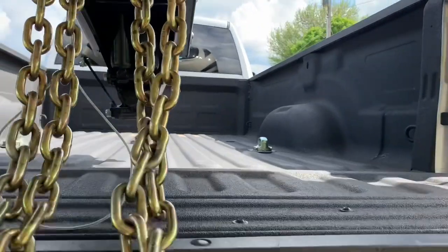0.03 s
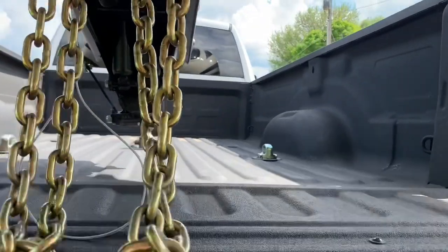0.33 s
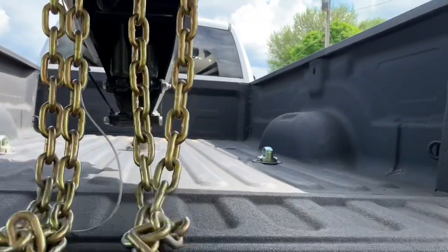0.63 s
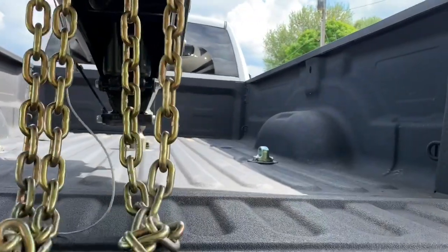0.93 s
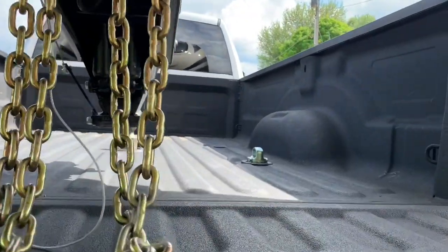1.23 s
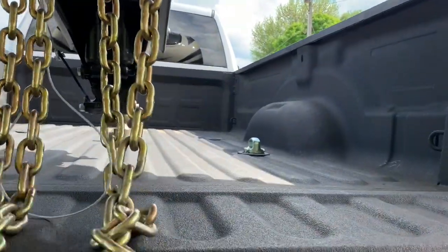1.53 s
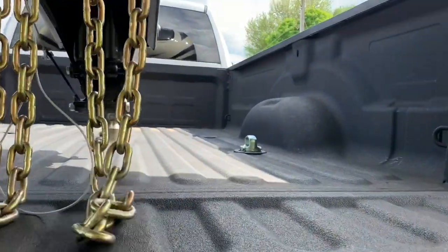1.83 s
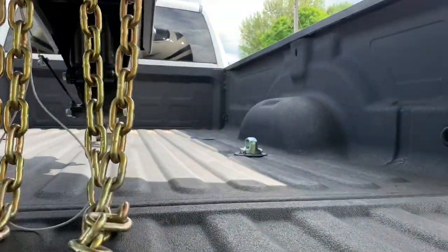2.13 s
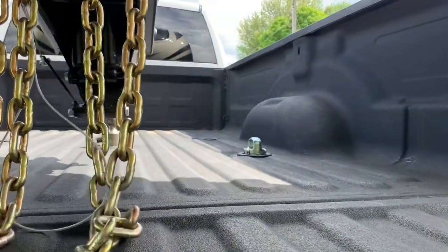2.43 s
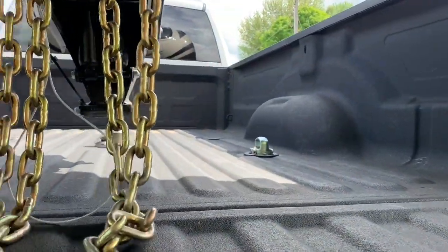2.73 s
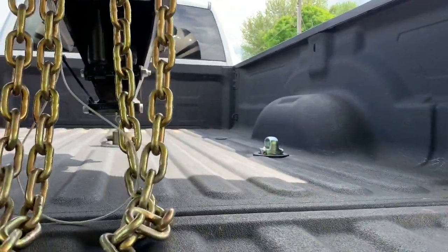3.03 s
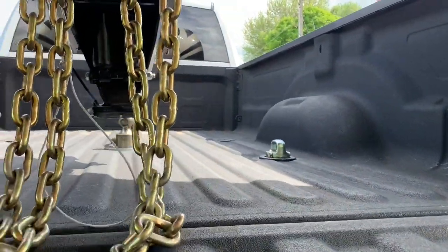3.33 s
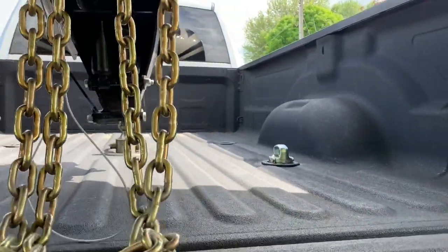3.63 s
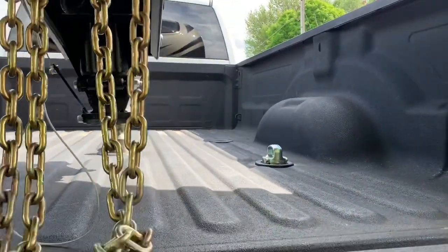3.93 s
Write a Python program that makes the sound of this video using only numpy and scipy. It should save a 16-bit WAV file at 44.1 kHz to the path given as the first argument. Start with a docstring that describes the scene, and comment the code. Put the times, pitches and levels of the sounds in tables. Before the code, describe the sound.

Steel chains rattle and clink in bursts, with hollow bumps and a low engine idle.

```python
"""Chains by a pickup tailgate

A camera is shifted in three moves over the tailgate of a pickup, close to hanging steel chains.
Stick-slip friction and bumps excite the hollow bed; links knock, and small steel parts tick and
ring in very high modes. An engine idles nearby under the outdoor rumble; a far bird chirps once."""
import sys
import numpy as np
from scipy import signal
from scipy.fft import rfft, irfft
from scipy.io import wavfile
from scipy.ndimage import uniform_filter1d

SR = 44100
rng = np.random.default_rng(int(sys.argv[2]) if len(sys.argv) > 2 else 0)


def dump_mix(stems):
    """Bounce the given channels to the path in sys.argv[1] as a 16-bit WAV at rate SR."""
    frames = np.atleast_2d(stems).T  # one column per channel
    limited = np.clip(frames, -1, 1)  # hard clip at full scale
    pcm = np.round(limited * 32767).astype(np.int16)
    wavfile.write(sys.argv[1], SR, pcm)


N = 176400


def undb(db):
    """Decibels to amplitude ratio."""
    return 10 ** (np.asarray(db) / 20)


def unit(x):
    """Normalisation to rms 1."""
    return x / np.sqrt(np.mean(x ** 2) + 1e-20)


def curve(rows, column=1):
    """Amplitude envelope from one dB column; silent outside its span."""
    rows = np.array(rows)
    return undb(np.interp(np.arange(N) / SR, rows[:, 0], rows[:, column], left=-200, right=-200))


def swell(middle_s, half_s):
    """Gaussian envelope."""
    return np.exp(-((np.arange(N) / SR - middle_s) / half_s) ** 2)


def response(points):
    """Magnitude response through (frequency_hz, gain_db) points."""
    hz, db = np.array(points).T
    return undb(np.interp(np.log(np.arange(N // 2 + 1) * SR / N + 1), np.log(hz), db))


def colour(x, points):
    """Minimum-phase filtering to a given spectral shape, at rms 1."""
    cepstrum = irfft(np.log(response(points)), N)
    cepstrum[1:N // 2] *= 2
    cepstrum[N // 2 + 1:] = 0
    return unit(irfft(rfft(x) * np.exp(rfft(cepstrum)), N))


def noise():
    """Two uncorrelated white noises."""
    return rng.standard_normal((2, N))


def walk(rate_hz):
    """Smooth random modulation at rms 1."""
    hold = int(SR / rate_hz)
    steps = np.repeat(rng.standard_normal(N // hold + 1), hold)
    return unit(uniform_filter1d(uniform_filter1d(steps, hold), hold)[:N])


def fade(t60):
    """Exponential decay, 60 dB in t60 seconds, cut at a quarter second."""
    return np.exp(-np.log(1000) * np.arange(SR // 4) / SR / max(t60, 1e-3))


def mode(hz, t60, phase=0):
    """Free vibration of a damped oscillator."""
    return fade(t60) * np.sin(2 * np.pi * hz * np.arange(SR // 4) / SR + phase)


def knock(hz, t60, scatter, count=20):
    """Impulse response of one main mode in a dense cluster, as mid and side."""
    neighbours_hz = hz * np.exp(scatter * rng.uniform(-1, 1, count))
    cluster = sum(rng.standard_normal((2, 1)) * mode(f, t60) for f in neighbours_hz)
    return cluster / np.sqrt(count) + np.array([[.5], [0]]) * mode(hz, t60)


def contacts(per_s, scatter_db):
    """Poisson train of tiny uneven impacts, each shared at random between two channels."""
    hit = rng.random(N) < per_s / SR
    size = undb(scatter_db * np.minimum(rng.exponential(size=N), 4))
    angle = 2 * np.pi * rng.random(N)
    return unit(hit * size * np.array([np.cos(angle), np.sin(angle)]))


def ring(force, body):
    """Forced vibration: convolution with a body's impulse response at unit energy."""
    body = body / np.sqrt(np.sum(body ** 2, axis=1, keepdims=True))
    return signal.fftconvolve(force, body, axes=1)[:, :N]


def add(out, start_s, sound):
    """Superposition of a sound at its onset."""
    i = max(int(start_s * SR), 0)
    out[:, i:i + sound.shape[1]] += sound[:, :N - i]


# Stereo width: frequency_hz, side_minus_mid_db
WIDTH = [(60, -5.5), (200, -14), (380, -8.5), (700, -4.5), (1300, -0.5), (2400, 2.5), (15000, -3.5)]
def spread(pair):
    """Mid-side stereo: left and right are more coherent in the bass than in the treble."""
    width = response(WIDTH)
    weights = np.array([np.ones_like(width), width]) / np.hypot(1, width)
    mid, side = irfft(rfft(pair) * weights, N)
    return np.array([mid + side, mid - side])


# Spectrum of the open air: frequency_hz, relative_db
AIR_SPECTRUM = [(20, -42), (48, -9.5), (120, -9.5), (205, -17.5), (291, -18), (510, -32), (762, -26.5),
                (826, -31.5), (1110, -34.5), (4830, -52), (8600, -73), (11000, -77.5), (15600, -108)]
# Its envelope: time_s, level_db
AIR_LEVEL = [(0, -27), (.5, -35), (1.15, -32), (1.9, -30), (3.3, -30.5), (3.8, -26.5), (4, -37)]
def outdoors():
    """Broadband ambient noise: a gently wavering rumble with faint hiss."""
    return spread(colour(noise(), AIR_SPECTRUM)) * curve(AIR_LEVEL) * undb(1.1 * walk(9.03))


# Engine tones: harmonic_number, relative_db
IDLE_HARMONICS = [(2, -34.5), (3, -31), (4, -56.5), (9, -48.5)]
# Engine envelope: time_s, gain_db
IDLE_GAIN = [(0, -3.5), (.28, 1), (.36, -9), (.68, -7.5), (.85, 0), (1.5, 2), (3.8, 2), (4, -6)]
def engine(firing_hz=32.72, wander=0.00703, lope_hz=86.83, lope_width_hz=26):
    """Periodic firing gives harmonics and pulsed clatter; narrowband noise adds an uneven lope."""
    phase = 2 * np.pi * np.cumsum(firing_hz * (1 + wander * walk(5.004))) / SR
    tones = 0
    for harmonic, db in IDLE_HARMONICS:
        amplitude = np.sqrt(2) * undb(db + 2 * walk(15))
        tones += amplitude * np.sin(harmonic * phase + 2 * np.pi * rng.random())
    lope_phase = 2 * np.pi * lope_hz * np.arange(N) / SR
    lope = unit(walk(lope_width_hz) * np.sin(lope_phase + walk(lope_width_hz)))
    firings = noise() * (1 + np.cos(phase)) * undb(2 * walk(20))
    clatter = spread(unit(ring(firings, knock(hz=1745, t60=0.18, scatter=0.31))))
    return (tones + undb(-36) * lope + undb(-57.5) * clatter) * curve(IDLE_GAIN)


# Envelopes, one list per move: time_s, scrape_gain_db, grit_gain_db, jingle_gain_db
MOVE_ENVELOPES = [
    [(.045, -53, -55, -70), (.057, -29.5, -47, -24), (.16, -31.5, -48.5, -27), (.21, -42.5, -52.5, -32),
     (.228, -23.5, -66, -52), (.25, -23.5, -54, -10.5), (.31, -30.5, -36, -16), (.335, -38.5, -48, -15.5),
     (.425, -26, -36.5, -13), (.46, -33, -44, -14), (.48, -38, -54, -33), (.497, -29, -46.5, -32),
     (.62, -35, -50, -22), (.69, -39, -60, -53), (.745, -36.5, -41, -34), (.79, -38.5, -64, -51),
     (1.05, -67, -100, -81)],
    [(1.36, -36, -58, -62), (1.425, -40.5, -55, -28), (1.455, -37, -60, -51), (1.475, -33, -34, -31),
     (1.52, -35, -46, -38), (1.57, -34, -45.5, -35), (1.605, -29, -45.5, -37), (1.68, -36, -55.5, -58),
     (1.765, -29.5, -42.5, -20), (1.82, -38.5, -53, -37), (1.87, -35.5, -49.5, -43), (1.97, -49, -94, -80)],
    [(3.1, -60, -72, -74.5), (3.57, -35.5, -71.5, -55), (3.615, -52, -59, -59), (3.67, -46, -67, -65),
     (3.69, -27.5, -44, -38.5), (3.75, -30.5, -49, -39), (3.785, -26.5, -38, -19), (3.8, -19, -33.5, -12.5),
     (3.855, -28.5, -37.5, -14.5), (3.893, -20.5, -29.5, -12), (3.915, -31, -37, -28),
     (3.95, -40, -57, -33), (4.0, -43.5, -61, -44)],
]
# Spectrum of the hollow bed: frequency_hz, relative_db
BED_SPECTRUM = [(60, -21.5), (150, -12), (240, -2.5), (330, -3), (600, -8.5), (900, -9), (1100, -20.5),
                (1700, -24), (2200, -20.5), (3400, -36.5), (7000, -45.5)]
# Its panel modes: pitch_hz, t60_s, relative_db
PANEL_MODES = [(242, 0.3, -0.5), (263, 0.084, -3.5), (288, 0.13, 1.5), (548.2, 0.21, -1), (695, 0.15, -7),
               (795.4, 0.08, -1), (1237, 0.1, -14.5)]
# Bumps against it: start_s, level_db, pitch_hz
BED_BUMPS = [(.217, -24.5, 763), (.302, -21, 340), (.408, -25.5, 559), (.495, -26.5, 424),
             (1.467, -22, 328), (1.528, -33, 503), (3.293, -31.5, 380), (3.575, -29.5, 600),
             (3.603, -28.5, 420), (3.687, -19, 400), (3.815, -22, 515), (3.85, -20, 269.5),
             (3.881, -26.5, 294)]
def bed(bump_t60_s=0.15):
    """Stick-slip friction and impacts drive the bed's panel modes; a bump also rings the struck spot."""
    push = undb(-1.5) * sum(curve(move) for move in MOVE_ENVELOPES)
    blows, spots = np.zeros((1, N)), np.zeros((2, N))
    for start, db, hz in BED_BUMPS:
        add(blows, start, undb(db - 3.5) * fade(bump_t60_s)[None])
        add(spots, start, undb(db) * knock(hz, bump_t60_s, scatter=0.351))
    slips = contacts(per_s=900, scatter_db=3)
    scrape = push * colour(slips, BED_SPECTRUM)
    thuds = blows * colour(noise(), BED_SPECTRUM)
    force = push * slips + blows * noise()
    panels = sum(undb(db) / np.sqrt(t60) * mode(hz, t60) for hz, t60, db in PANEL_MODES)
    return spread(scrape + spots + thuds + undb(-2) * ring(force, panels[None]))


def link(count=26):
    """Impulse response of damped chain links: dense modes at random pitches."""
    pitches_hz = rng.uniform(1400, 12500, count)
    modes = sum(rng.standard_normal((2, 1)) * mode(hz, t60=0.082) for hz in pitches_hz)
    return modes * np.sqrt(2 / count)


# High modes of a small steel part: pitch_hz, relative_db
STEEL_MODES = [(14030, -2), (14095, -6), (14185, -12), (14540, -4), (14665, -4), (15270, -14), (15490, 3),
               (15575, -7)]
def steel(t60, detune_hz=11, rise_s=0.0009):
    """Modal ringing of steel: each strike weights the modes anew on each side."""
    out = 0
    for hz, db in STEEL_MODES:
        gain = undb(db - 5 * rng.standard_normal((2, 1)))
        pitch_hz = hz + detune_hz * rng.standard_normal()
        out += gain * mode(pitch_hz, t60, phase=2 * np.pi * rng.random((2, 1)))
    out *= 1 - np.exp(-np.arange(SR // 4) / SR / rise_s)  # the ring swells in over about a millisecond
    energy = np.mean(np.sum(out ** 2, axis=1))
    return out * np.sqrt(np.sum(fade(t60) ** 2) / energy)


# Spectrum of a dry metal contact: frequency_hz, relative_db
TICK_SPECTRUM = [(200, -21.5), (2000, -2.5), (3200, -14), (4250, 2.5), (5400, -5), (7100, 3), (8500, -15.5),
                 (10100, 3.5), (11400, 1), (12900, -5.5), (16000, -11.5)]
def rattle():
    """Random excitation: in each move, tiny impacts crackle in link after link and ring the steel."""
    grains = contacts(per_s=450, scatter_db=3.5)
    links = unit(sum(ring(grains * walk(20) ** 2, link(count=40)) for _ in range(5)))
    grit = colour(grains + undb(1) * links, TICK_SPECTRUM)
    jingle = unit(ring(contacts(per_s=180, scatter_db=3.5), steel(t60=0.077)))
    grit_gain = undb(0.5) * sum(curve(move, column=2) for move in MOVE_ENVELOPES)
    jingle_gain = undb(-6) * sum(curve(move, column=3) for move in MOVE_ENVELOPES)
    return grit_gain * grit + jingle_gain * jingle


# Knocks between heavy links: start_s, level_db, pitch_hz
LINK_KNOCKS = [(.051, -23, 1097), (.138, -35, 1160), (.218, -31.5, 1300), (.301, -30, 1290),
               (.524, -38.5, 1510), (.612, -43.5, 2420), (1.401, -36.5, 2133), (1.466, -26, 1090),
               (1.507, -27.5, 1100), (1.594, -28.5, 995), (1.71, -34.5, 2270), (1.853, -40, 2404),
               (3.791, -25, 910), (3.882, -21.5, 1150)]
def clacks(t60=0.18):
    """Collisions of heavy links: a band of decaying noise and a modal ring, each at its own pitch."""
    out = np.zeros((2, N))
    for start, db, hz in LINK_KNOCKS:
        band = signal.butter(2, [hz / 2, hz * 2 ** .5], "bandpass", fs=SR, output="sos")
        crunch = fade(t60) * unit(signal.sosfilt(band, rng.standard_normal((2, SR // 4))))
        add(out, start, undb(db) * (crunch + undb(-5) * knock(hz, t60, scatter=.5)))
    return spread(out)


# Light metal contacts: start_s, tick_db, ring_db, ring_t60_s
STEEL_STRIKES = [(0.0575, -26.5, -7, 0.018), (0.073, -36, -23, .06), (0.106, -30.5, -28, .05),
                 (.116, -24, -5, 0.04), (0.155, -39, -36, 0.24), (0.238, -23.5, -11, 0.066),
                 (0.282, -26, -11, 0.13), (0.303, -23, -7, 0.043), (0.352, -26.5, -15, 0.13),
                 (.421, -44, -20, 0.13), (.505, -37, -27, .08), (0.524, -30.5, -38, .08),
                 (.567, -31.5, -22, 0.23), (.619, -30, -18.5, .14), (0.71, -37.5, -33, 0.11),
                 (0.791, -40.5, -36.5, 0.092), (1.377, -38.5, -38, .05), (1.401, -33.5, -33, .08),
                 (1.423, -37, -40, .08), (1.4665, -22, -10.5, 0.16), (1.51, -32.5, -29, 0.091),
                 (1.642, -37, -30, 0.13), (1.71, -36, -34, 0.1), (1.735, -35, -24, 0.12),
                 (1.869, -40, -28, 0.099), (2.403, -56, -59, .1), (2.547, -47, -52, .12),
                 (3.256, -43.5, -39, 0.078), (3.309, -39.5, -36, 0.075), (3.432, -45, -51, 0.089),
                 (3.460, -42.5, -46, 0.22), (3.608, -36.5, -31.5, 0.084), (3.681, -29, -25, .08),
                 (3.691, -32, -17, 0.13), (3.735, -37.5, -25, 0.09), (3.764, -32.5, -31, 0.087),
                 (3.864, -28, -18, .12), (3.882, -21, -15.5, 0.13), (3.889, -22, -12, .1)]
def clinks():
    """Impulsive excitation: a broadband tick, then free decay of link modes and high steel modes."""
    rings, ticks = np.zeros((2, N)), np.zeros((1, N))
    for start, tick_db, ring_db, t60 in STEEL_STRIKES:
        add(rings, start, undb(ring_db) * steel(t60) + undb(tick_db - 13.5) * link())
        add(ticks, start, undb(tick_db) * fade(t60=0.018)[None])
    return rings + ticks * colour(noise(), TICK_SPECTRUM)


# Panel groans: middle_s, half_length_s, pitch_hz, level_db
PANEL_GROANS = [(0.365, 0.083, 289.7, -30), (0.432, 0.25, 237.8, -29), (0.757, 0.038, 232.5, -23.5),
                (1.502, 0.042, 235, -29.5), (1.761, 0.048, 237.4, -26.5), (3.587, 0.29, 368.3, -37)]
def groan(wander=0.0273):
    """Friction-driven oscillation: dragging sustains single panel modes, unsteadily."""
    out = 0
    for middle, half, hz, db in PANEL_GROANS:
        phase = 2 * np.pi * np.cumsum(hz * (1 + wander * walk(60))) / SR
        out += undb(db + 2 * walk(50)) * swell(middle, half) * np.sin(phase)
    return out


def bird(middle_s=2.65, half_s=.03, from_hz=3400, to_hz=2600):
    """A faint falling frequency sweep; random amplitude modulation gives the blur of distance."""
    hz = np.interp(np.arange(N) / SR, [middle_s - half_s, middle_s + half_s], [from_hz, to_hz])
    chirp = np.sin(2 * np.pi * np.cumsum(hz) / SR)
    return undb(-52) * swell(middle_s, half_s) * walk(400) * chirp


def scene():
    """Superposition of the nearby metal and bed with the engine, the open air and the bird."""
    return clinks() + clacks() + rattle() + bed() + groan() + engine() + outdoors() + bird()


def record(dry, low_hz=34.3, high_hz=16000):
    """Band limiting and saturation: the camera drops deep rumble, limits peaks and cuts the top."""
    highpass = signal.butter(3, low_hz, "highpass", fs=SR, output="sos")
    lowpass = signal.ellip(8, .2, 70, high_hz, fs=SR, output="sos")
    limited = np.clip(signal.sosfilt(highpass, dry), -1, 1)
    return signal.sosfilt(lowpass, limited)


dry = scene()
out = record(dry)
dump_mix(out)
```